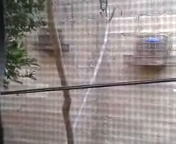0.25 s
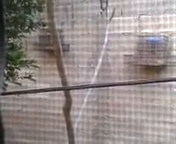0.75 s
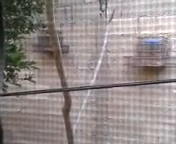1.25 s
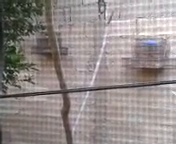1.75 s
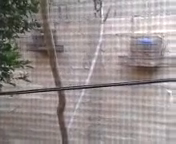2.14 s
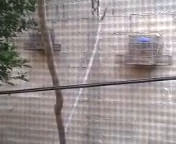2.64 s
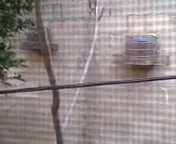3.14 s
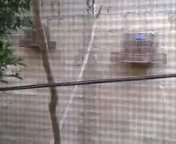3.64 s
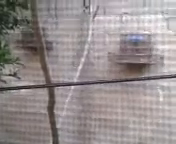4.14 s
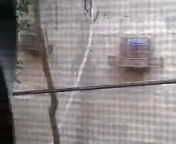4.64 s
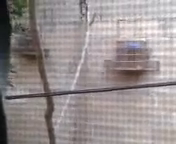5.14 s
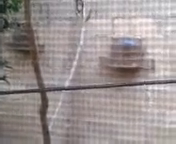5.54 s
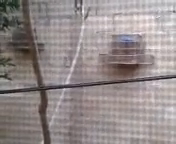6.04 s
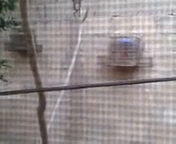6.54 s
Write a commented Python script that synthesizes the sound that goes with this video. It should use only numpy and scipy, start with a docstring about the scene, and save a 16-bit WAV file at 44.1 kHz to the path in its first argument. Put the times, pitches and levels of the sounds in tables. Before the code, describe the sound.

Close birdsong, a sharp chip, a ticking trill, then alternating high slurs and low notes, with distant birds and town traffic behind.

```python
"""A caged seedeater sings close by in a walled yard, heard through a window screen on a small camera's mic.
One sharp chip and a soft ticking trill; then the two sides of its syrinx alternate rising slurs and
low notes, and a falling whistle crosses a long rising one. The yard walls echo the song.
Farther off are other birds and the town's traffic; at the microphone, hiss and a hand on the camera."""
import sys
import numpy as np
from scipy import signal
from scipy.fft import rfft, irfft, next_fast_len
from scipy.io import wavfile
from scipy.ndimage import map_coordinates

SR = 44100
rng = np.random.default_rng(int(sys.argv[2]) if len(sys.argv) > 2 else 0)


def transcribe(signal):
    """Save signal, clipped to [-1, 1], as a 16-bit WAV file at the path in sys.argv[1]."""
    frames = np.atleast_2d(signal).T
    limited = np.clip(frames, -1, 1)
    pcm = np.round(limited * 32767).astype(np.int16)
    wavfile.write(sys.argv[1], SR, pcm)


N = 299880


def amp(db):
    """Decibels to gain."""
    return 10 ** (np.asarray(db) / 20)


def clock():
    """The time of every sample."""
    return np.arange(N) / SR


def steps(length):
    """Control times along one note, from its start."""
    return np.linspace(0, length, 200)


def wobble(rate, size):
    """A smooth random curve, rate knots a second."""
    knots = rng.standard_normal(int(size * rate / SR) + 4)
    return map_coordinates(knots, [np.arange(size) * rate / SR])


def coloured(x, points):
    """x through a spectrum of (f/Hz, level/dB) points on a log axis."""
    size = next_fast_len(N + 8192)
    hz, db = np.transpose(points)
    gain = amp(np.interp(np.log(np.fft.rfftfreq(size, 1 / SR) + 1), np.log(hz), db))
    return irfft(rfft(x, size) * gain, size)[:N]


def noise(points):
    """Coloured noise of rms 1."""
    x = coloured(rng.standard_normal(N), points)
    return x / np.sqrt(np.mean(x ** 2) + 1e-20)


def add(out, s, x):
    """Mix x into out from time s on."""
    part = out[max(round(s * SR), 0):][:len(x)]
    part += x[:len(part)]


def voice(rows, waver, flutter_db, fade, tremble=220):
    """Phase and amplitude along (t/s, f/Hz, level/dB) rows; a fast, deep pitch tremble makes a rasp."""
    s, hz, db = np.transpose(rows)
    t = s[0] + np.arange(max(int((s[-1] - s[0]) * SR), 2)) / SR
    pitch = np.interp(t, s, hz) * (1 + waver * wobble(tremble, len(t)))
    gate = np.sin(np.pi / 2 * np.clip(np.minimum(t - t[0], t[-1] - t) / fade, 0, 1)) ** 2
    level = amp(np.interp(t, s, db) + flutter_db * wobble(120, len(t)))
    return 2 * np.pi * np.cumsum(pitch) / SR, np.sqrt(2) * gate * level


def sing(notes, waver, flutter_db, fade, tremble=220):
    """Each note as one whistled sine glide."""
    out = np.zeros(N)
    for note in notes:
        phase, level = voice(note, waver, flutter_db, fade, tremble)
        add(out, note[0][0], level * np.sin(phase))
    return out


def glides(calls, edge_db, flutter_db, fade, tremble):
    """Short straight glides, loudest in the middle, each with its own rasp."""
    out = np.zeros(N)
    for s, length, start, end, db, rasp in calls:
        middle = (s + length / 2, (start + end) / 2, db)
        note = [(s, start, db + edge_db), middle, (s + length, end, db + edge_db)]
        out += sing([note], rasp, flutter_db, fade, tremble)
    return out


# traffic loudness: t/s, level/dB
TRAFFIC_LEVEL = [(0, -50.5), (2.4, -50), (4.2, -50), (5.0, -51), (6.8, -51)]
# spectra of the traffic and the hiss: f/Hz, level/dB
TRAFFIC_SPECTRUM = [(60, -40), (105, -27.5), (135, -11), (170, -7.5), (210, -8), (290, 0), (480, 0.5),
                    (640, 1), (760, -0.5), (1050, -1), (1400, -8.5), (2000, -16), (4000, -18), (9000, -47)]
HISS_SPECTRUM = [(300, -16), (1500, -4), (2700, 0), (4000, -6), (6000, -2.5), (7150, -6), (7800, -33.5),
                 (9000, -36)]
def background(hiss_db=-58):
    """Distant town traffic beyond the walls, and an even hiss."""
    traffic_db = np.interp(clock(), *np.transpose(TRAFFIC_LEVEL))
    return amp(traffic_db) * noise(TRAFFIC_SPECTRUM) + amp(hiss_db) * noise(HISS_SPECTRUM)


def engine(hz=654, start_db=-60, fade_db_per_s=1.5, swell_s=2.85, width_s=.45, swell_db=7):
    """One far engine drones, swells once and slowly recedes."""
    out, t = np.zeros(N), steps(N / SR)
    db = start_db - fade_db_per_s * t + swell_db * np.exp(-((t - swell_s) / width_s) ** 2)
    return sing([np.column_stack([t, np.full_like(t, hz), db])], waver=.025, flutter_db=3, fade=.01)


# soft knocks of the hand on the camera: t/s, relative level/dB, half length/s
HAND_BUMPS = [(1.598, -60, .05), (2.69, -60, 0.049), (3.05, -64, .04), (5.263, -58, 0.073),
              (6.445, -50.5, .04), (6.706, -58.5, .1)]
# their rumble: f/Hz, level/dB
RUMBLE_SPECTRUM = [(10, 1), (30, -6), (52, -5.5), (66, -11), (82, -11.5), (98, -27.5), (200, -72)]
def handling(rumble_db=-64.5, bump_db=-2):
    """Right at the microphone, a low rumble that swells briefly when the hand shifts."""
    swell = sum(amp(db + bump_db) * np.exp(-((clock() - s) / width) ** 2) for s, db, width in HAND_BUMPS)
    return (amp(rumble_db) + swell) * noise(RUMBLE_SPECTRUM)


# small dry ticks: t/s, level/dB, t60/s
DRY_TAPS = [(.135, -51, 0.21), (3.37, -54, 0.2), (4.111, -34, .009), (4.195, -52, 0.16), (4.52, -43.5, .1),
            (5.052, -48, .08), (5.228, -53.5, 0.1)]
# their spectrum: f/Hz, level/dB
TAP_SPECTRUM = [(800, -26.5), (2500, -3), (4500, 0.5), (7000, -1.5), (8000, -17), (9500, -50.5)]
def taps():
    """Bursts of bright noise that die at once, with no echo from the yard."""
    level, t = np.zeros(N), np.arange(SR // 4) / SR
    for s, db, t60 in DRY_TAPS:
        add(level, s, amp(db) * np.exp(-np.log(1000) * t / t60))
    return level * noise(TAP_SPECTRUM)


def yard_tail(x, t60, build_s=.012):
    """Diffuse reverberation builds up between the walls and dies away."""
    t = np.arange(SR * 2 // 3) / SR
    tail = rng.standard_normal(len(t)) * np.exp(-np.log(1000) * t / t60) * (1 - np.exp(-t / build_s))
    return signal.fftconvolve(x, tail / np.linalg.norm(tail))[:N]


# far chirps: t/s, length/s, start f/Hz, end f/Hz, relative level/dB, rasp/0-1
FAR_CHIRPS = [(1.19, 0.05, 3160, 3300, -62, .015), (1.41, .046, 4380, 4200, -65, .015),
              (1.48, 0.076, 3610, 3095, -57.5, 0.07), (1.94, .051, 3490, 3520, -56, .005),
              (2.06, 0.044, 3520, 3520, -58.5, 0.01), (2.06, .04, 6900, 7200, -58, 0.13),
              (2.29, .08, 3180, 2920, -53, 0), (2.45, .05, 3850, 3150, -56.5, 0.1),
              (2.68, 0.056, 3390, 3310, -53, 0.03)]
# thin, hissy contact notes: t/s, length/s, start f/Hz, end f/Hz, relative level/dB
CONTACT_NOTES = [(.35, 0.034, 7480, 6530, -53.5), (0.367, .03, 5200, 4670, -55),
                 (0.517, .04, 7540, 6480, -57.5), (3.867, .04, 7480, 6610, -54),
                 (5.505, 0.022, 7650, 6920, -53.5)]
def far_birds(chirp_db=2.5, contact_db=-1, rasp=.063):
    """Birds elsewhere in the neighbourhood reach the microphone mostly as reverberation."""
    chirps = glides(FAR_CHIRPS, edge_db=-3, flutter_db=2, fade=.007, tremble=350)
    hissy_notes = [(*row, rasp) for row in CONTACT_NOTES]
    contacts = glides(hissy_notes, edge_db=-3, flutter_db=2, fade=.004, tremble=1500)
    birds = amp(chirp_db) * chirps + amp(contact_db) * contacts
    return amp(-9) * birds + amp(-1) * yard_tail(birds, t60=.34)


# echoes off the yard walls: delay/s, level/dB
WALL_REFLECTIONS = [(.0062, -12), (0.01, -6), (0.0235, -7.5), (.029, -14), (.046, -9), (.066, -17),
                    (.098, -23)]
def wall_echoes(x):
    """Single reflections; at the microphone a glide beats against its own delayed copies."""
    out = np.zeros(N)
    for delay, db in WALL_REFLECTIONS:
        add(out, delay, amp(db) * x)
    return out


# course of the sharp chip: t/s, f/Hz, relative level/dB
CHIP_COURSE = [(1.058, 6190, -58), (1.061, 7970, -40), (1.067, 8020, -45), (1.072, 7420, -32),
               (1.079, 7530, -39.5), (1.0827, 6760, -25.5), (1.0853, 6250, -37), (1.088, 5800, -53)]
def chip(gain_db=3):
    """From the cage close by, a rough high lead-in that snaps steeply downward."""
    return amp(gain_db) * sing([CHIP_COURSE], waver=.014, flutter_db=.5, fade=.00083, tremble=1200)


# course of the trill: t/s, f/Hz, relative level/dB
TRILL_COURSE = [(1.55, 6220, -49), (1.8, 6020, -41.5), (1.98, 6120, -41.5), (2.1, 6200, -48),
                (2.42, 6260, -46), (2.49, 6530, -47.5)]
def trill(start_s=1.552, gap_s=.0605, slowing_s=.00022, count=16, accents=(11, 15), accent_db=8,
          drop_hz=280, edge_db=-11, rasp_hz=7600, rasp_db=-16, low_hz=4480, low_db=-21, gain_db=-1):
    """Ticks that slow a little: each a downward peep, a high rasp and a faint low note."""
    k = np.arange(count)
    times = start_s + gap_s * k + slowing_s * k ** 2 / 2
    at, pitch, level = np.transpose(TRILL_COURSE)
    levels = np.interp(times, at, level) + accent_db * np.isin(k, accents)
    peeps, rasps, lows = [], [], []
    for s, hz, db in zip(times, np.interp(times, at, pitch), levels):
        edge, rasp, low = db + edge_db, db + rasp_db, db + low_db
        peeps.append([(s - .007, hz + drop_hz, edge), (s, hz, db), (s + .003, hz - drop_hz / 2, edge)])
        rasps.append([(s, hz + 400, rasp), (s + .0041, rasp_hz, rasp), (s + .028, rasp_hz, rasp - 4)])
        lows.append([(s + .016, low_hz + 100, low), (s + .04, low_hz - 100, low)])
    clear = sing(peeps + lows, waver=.012, flutter_db=1, fade=.001, tremble=700)
    rough = sing(rasps, waver=.045, flutter_db=2, fade=.002, tremble=1800)
    return amp(gain_db) * (clear + rough)


# downward flicks: t/s, length/s, start f/Hz, end f/Hz, relative level/dB, rasp/0-1
SONG_FLICKS = [(4.19, 0.028, 4600, 3920, -57, .065), (5.048, .016, 4750, 2640, -49, 0.03),
               (6.3, 0.088, 4600, 3670, -48, .065)]
def flicks(gain_db=-1):
    """Quick, faint drops in pitch between the near bird's notes."""
    return amp(gain_db) * glides(SONG_FLICKS, edge_db=-5.5, flutter_db=4, fade=.003, tremble=700)


# a quick and a slow lift in pitch: rise/Hz, time constant/s
PITCH_LIFTS = [(170, .045), (305, .21)]
# partials 1 to 4: level/dB at the lowest pitch, level/dB at the highest
REEDY_PARTIALS = [(-29.5, -4), (2, 1), (-27, 1.5), (-25.5, -15)]
def rising_whistle(start_s=6.055, length=.76, top_hz=1838, attack_s=.045, hold_s=.18, gain_db=-2):
    """A long reedy note that levels off; its partials fill in as the pitch climbs."""
    out, t = np.zeros(N), steps(length)
    hz = top_hz - sum(rise * np.exp(-t / lag) for rise, lag in PITCH_LIFTS)
    db = np.interp(t, [0, attack_s, attack_s + hold_s, length], [-64.5, -49.5, -49.5, -58])
    phase, level = voice(np.column_stack([start_s + t, hz, db]), waver=.0006, flutter_db=1.6, fade=.011)
    climb = np.interp(np.linspace(0, length, len(phase)), t, (hz - hz[0]) / (hz[-1] - hz[0])) ** 3
    tone = sum(amp(first + (last - first) * climb) * np.sin(k * phase)
               for k, (first, last) in enumerate(REEDY_PARTIALS, 1))
    add(out, start_s, level * tone)
    return amp(gain_db) * out


def falling_whistle(start_s=6.3, length=.53, lead_s=.089, attack_s=.008, release_s=.16,
                    start_hz=4880, sink_hz_per_s=2550, floor_hz=4040, knee_hz=35, gain_db=-1):
    """A soft lead-in, a sudden full voice, then a long fade while the pitch sinks to its floor."""
    t = steps(length)
    above_floor = start_hz - sink_hz_per_s * t - floor_hz
    hz = floor_hz + knee_hz * np.logaddexp(0, above_floor / knee_hz)
    db = np.interp(t, [lead_s, lead_s + attack_s, length - release_s, length], [-48, -30.5, -40.5, -55])
    note = np.column_stack([start_s + t, hz, db])
    return amp(gain_db) * sing([note], waver=.0052, flutter_db=1.5, fade=.01)


# low notes: t/s, length/s, climb/s, top f/Hz, relative level/dB, overtone/dB, its fade/(dB/s)
LOW_SIDE_NOTES = [(3.904, 0.089, .05, 3020, -37.5, -68, 49), (4.215, .117, .044, 3140, -35.5, -55, 59.5),
                  (4.529, .143, .07, 3176, -28.5, -38.5, 171.5)]
def low_notes(start_ratio=.9, sag_hz_per_s=600, onset_db=-23.5, release_s=.016, end_db=-21):
    """The low side of the syrinx climbs, then sags a little. Returns the notes and their fading octaves."""
    notes, octaves = [], []
    for s, length, climb, top_hz, db, octave_db, octave_fade in LOW_SIDE_NOTES:
        t = steps(length)
        progress = np.minimum(t / climb, 1)
        effort = np.sin(np.pi / 2 * progress) ** 2
        hz = top_hz * (start_ratio + (1 - start_ratio) * effort)
        hz -= sag_hz_per_s * np.maximum(t - climb, 0)
        shape = onset_db * (1 - progress) ** 2 + np.interp(t, [length - release_s, length], [0, end_db])
        notes.append(np.column_stack([s + t, hz, db + shape]))
        octaves.append(np.column_stack([s + t, 2 * hz, octave_db - octave_fade * t]))
    low = amp(-.1) * sing(notes, waver=.0021, flutter_db=1.75, fade=.0036, tremble=210)
    return low, amp(-1.5) * sing(octaves, waver=.0053, flutter_db=2, fade=.002)


# slurs: t/s, length/s, start f/Hz, end f/Hz, onset offset/Hz, leap after/s, relative peak level/dB
HIGH_SIDE_SLURS = [(3.758, .15, 4750, 5620, -52.5, .06, -51), (4.07, .143, 4615, 5523, 90, .075, -29.5),
                   (4.399, .14, 4438, 5322, 350, .072, -23.5), (4.725, 0.15, 4202, 5456, -250, .091, -23),
                   (4.909, .144, 3757, 5350, 10, .089, -23)]
def slurs(scoop_s=.01, leap_half_s=.0058, leap_share=.18, attack_s=.021, dip_s=.016, gain_db=-1.5):
    """The high side of the syrinx scoops onto an even rise with one quick leap in pitch."""
    notes = []
    for s, length, start_hz, end_hz, offset_hz, leap, db in HIGH_SIDE_SLURS:
        t = steps(length)
        leapt = (1 + np.tanh((t - leap) / leap_half_s)) / 2
        rise = (1 - leap_share) * t / length + leap_share * leapt
        hz = start_hz + (end_hz - start_hz) * rise + offset_hz * np.exp(-t / scoop_s)
        # the voice swells, thins just before the leap and peaks right after it
        before_db = np.interp(t, [0, attack_s, leap - dip_s, leap], [-28, -9, -3, -6.5])
        after_db = -10 * ((t - leap) / (length - leap)) ** 2
        opened = np.clip((t - leap) / leap_half_s, 0, 1)
        notes.append(np.column_stack([s + t, hz, db + before_db + (after_db - before_db) * opened]))
    return amp(gain_db) * sing(notes, waver=.0053, flutter_db=2, fade=.002)


def scene(far_wall_s=.097, far_wall_db=-19):
    """From the window: the near bird and its echoes in front, far birds and the town behind."""
    low, octaves = low_notes()
    high = slurs() + octaves + falling_whistle() + rising_whistle() + flicks()
    call, ticks = chip(), trill()
    yard = wall_echoes(high + amp(-8) * low + amp(-2) * call + amp(-8) * ticks)
    yard += yard_tail(amp(-8.5) * (high + call) + amp(-12.5) * low + amp(-8) * ticks, t60=.36)
    add(yard, far_wall_s, amp(far_wall_db) * low)  # low notes spread widely and return from a far wall
    surroundings = far_birds() + taps() + background() + engine() + handling()
    return (high + low + call + ticks + yard + surroundings)[None]


# response of the camera's microphone and filter: f/Hz, level/dB
MIC_RESPONSE = [(20, 0.5), (7200, -1.5), (7600, -14), (8000, -16.5), (8700, -30.5), (9050, -37.5)]
def record(dry, sampling_hz=16000, top_hz=9050):
    """The camera's low sampling rate mirrors the top treble; its filter dulls that and cuts the rest."""
    mirrored = dry[0] * (1 + 2 * np.cos(2 * np.pi * sampling_hz * clock()))
    sound = coloured(mirrored, MIC_RESPONSE) + .0043  # the converter rests slightly off zero
    return irfft(rfft(sound) * (np.fft.rfftfreq(N, 1 / SR) < top_hz), N)[None]


dry = scene()
out = record(dry)
transcribe(out)
```